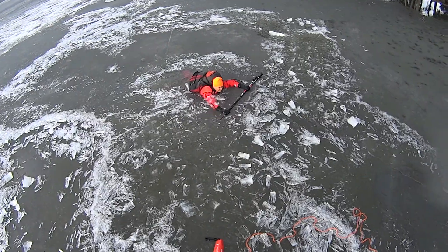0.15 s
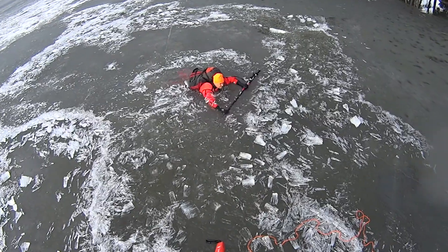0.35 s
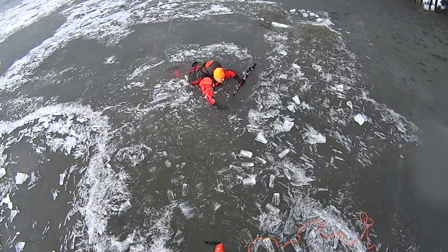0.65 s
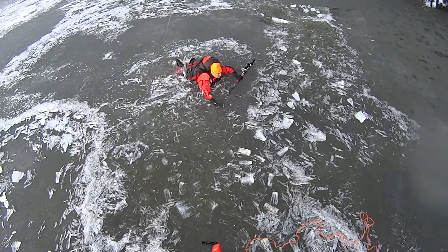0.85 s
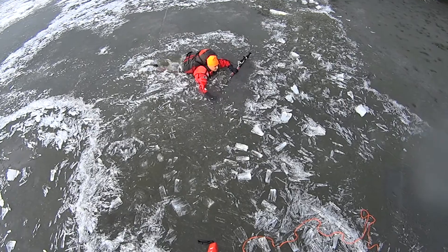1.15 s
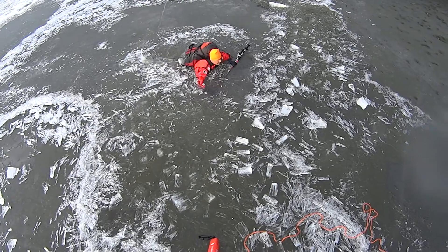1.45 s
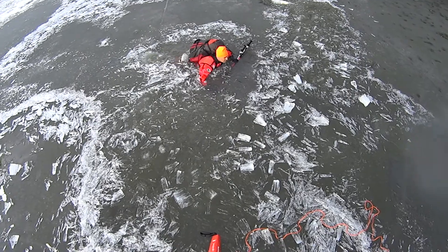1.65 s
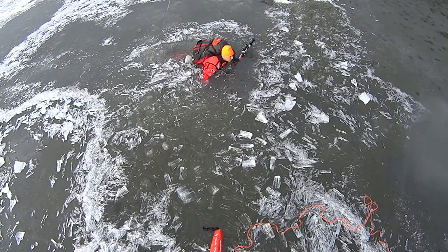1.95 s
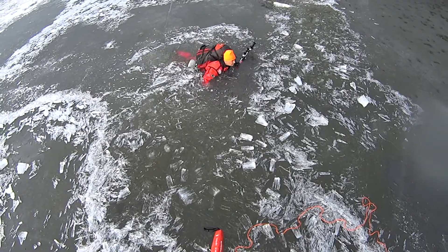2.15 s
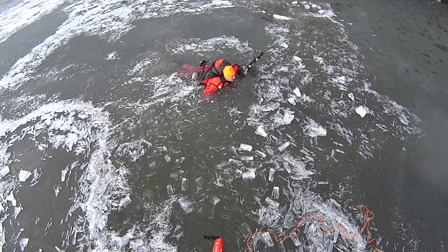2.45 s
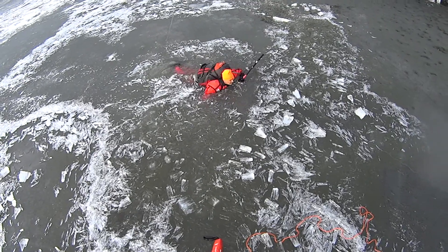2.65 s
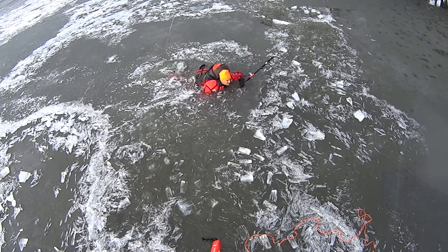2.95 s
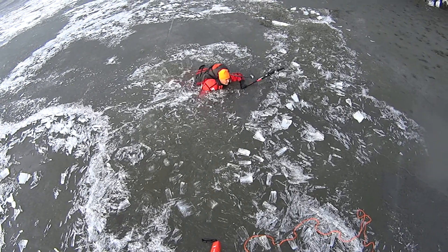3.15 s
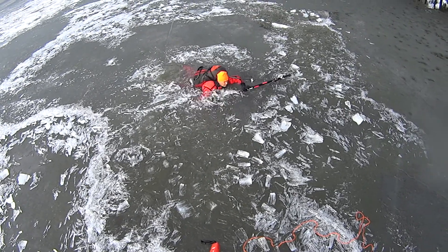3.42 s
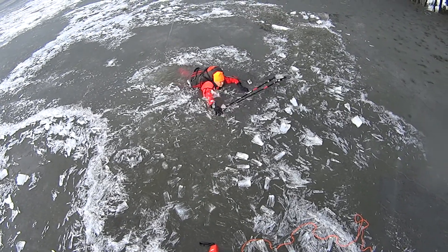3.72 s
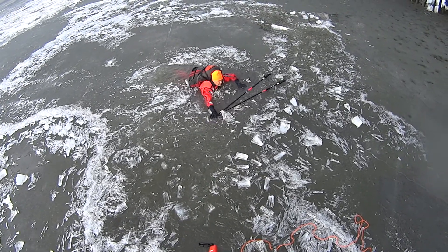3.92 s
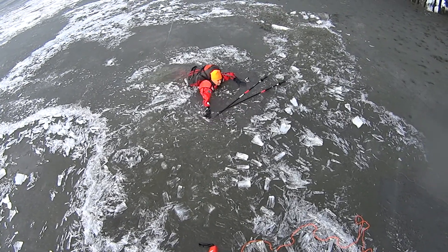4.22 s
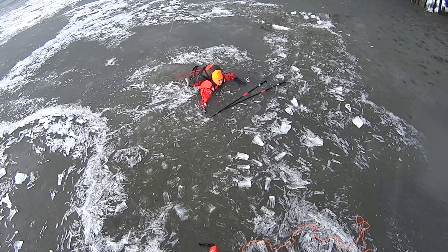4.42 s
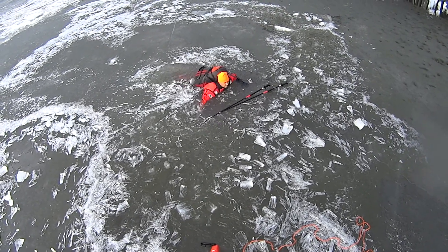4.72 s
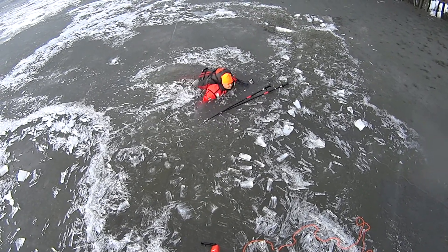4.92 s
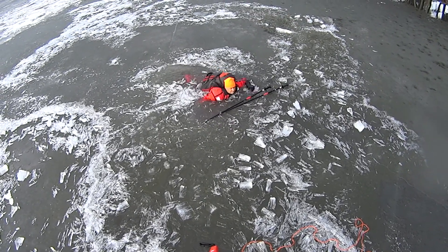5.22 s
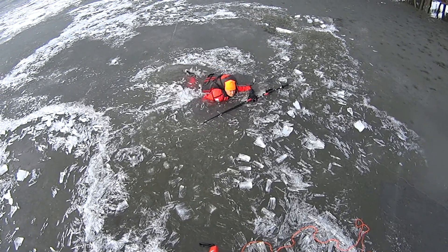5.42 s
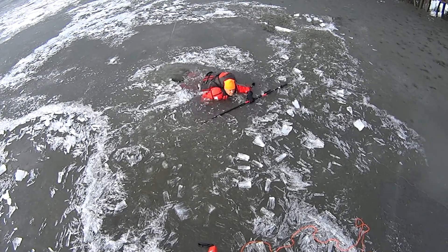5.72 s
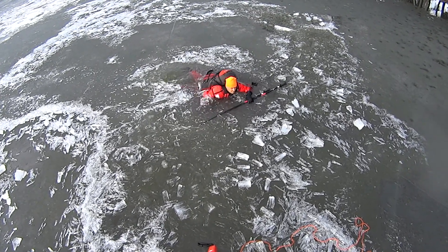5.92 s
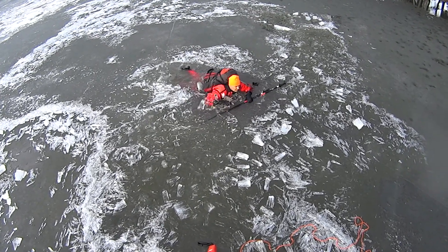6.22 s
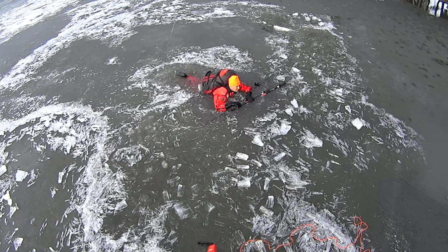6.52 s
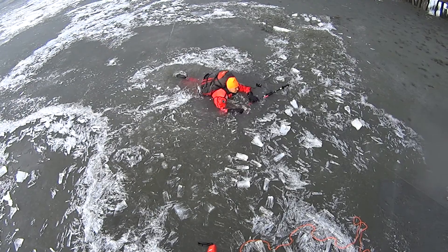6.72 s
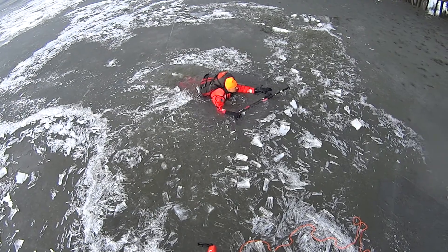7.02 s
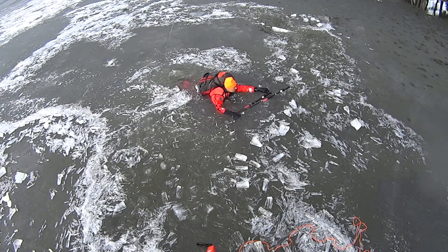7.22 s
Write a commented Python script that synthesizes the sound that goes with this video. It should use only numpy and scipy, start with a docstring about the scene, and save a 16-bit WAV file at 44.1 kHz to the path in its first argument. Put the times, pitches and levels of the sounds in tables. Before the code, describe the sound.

Water sloshes and thin broken ice crackles and clinks in repeated surges as someone swims through it, over light wind.

```python
"""On a lake of thin broken ice, a swimmer crawls along some metres from a small camera in a housing.
Each stroke shoves the floating shards together (dense crackle, single glassy clinks) and churns
the water (spray, bubbles, slaps); its wake keeps the ice rocking for seconds.
Close by, the camera mount is bumped and rubs, while a light wind rumbles underneath."""
import sys
import numpy as np
from scipy import signal
from scipy.fft import rfft, irfft, next_fast_len
from scipy.io import wavfile
from scipy.ndimage import map_coordinates

SR = 44100
rng = np.random.default_rng(int(sys.argv[2]) if len(sys.argv) > 2 else 0)


def output_pcm(signal):
    """Save a mono or channel-first signal as 16-bit PCM at the path in sys.argv[1].

    Samples are clipped to [-1, 1] before scaling.
    """
    pcm = np.clip(np.atleast_2d(signal).T, -1, 1) * 32767
    wavfile.write(sys.argv[1], SR, np.round(pcm).astype(np.int16))


N = 325017


def amp(db):
    """Decibels to gain."""
    return 10 ** (np.asarray(db) / 20)


def decibels(power):
    """Power to decibels."""
    return 10 * np.log10(power + 1e-12)


def unit(x):
    """Scaled to rms 1."""
    return x / np.sqrt(np.mean(x ** 2) + 1e-20)


def along(points, hz):
    """(Hz, value) points read on a log axis."""
    f, v = np.transpose(points)
    return np.interp(np.log(hz + 1), np.log(f + 1), v)


def wobble(rate):
    """A smooth random curve, rate knots a second."""
    return map_coordinates(rng.standard_normal(int(N * rate / SR) + 4), [np.arange(N) * rate / SR])


def filtered(x, response):
    """x times a response of frequency."""
    m = next_fast_len(N + SR // 2)
    return irfft(rfft(x, m) * response(np.fft.rfftfreq(m, 1 / SR)), m)[..., :N]


def equalised(x, eq):
    """x through an EQ curve of (Hz, dB) points."""
    return filtered(x, lambda hz: amp(along(eq, hz)))


def add(track, s, sound):
    """Mix a sound into a track at time s."""
    start = max(0, round(s * SR))
    part = track[..., start:start + sound.shape[-1]]
    part += sound[..., :part.shape[-1]]


def swell(s, rise, hold, t60):
    """Power over time of one push: it builds up to time s, holds, then dies away."""
    t = np.arange(N) / SR - s
    attack = np.exp(-np.clip(-t / rise, 0, 10) ** 2)
    return attack * amp(-60 * np.maximum(t - hold, 0) / t60) ** 2


def grains(level_db, count, band_hz, cycles, samples, scatter_db=0, rise=0):
    """A cloud of tiny rings that swell and die, more crowded where level_db is high; rms 1 throughout."""
    density = amp(level_db / 2)
    start = np.searchsorted(np.cumsum(density) / density.sum(), rng.random(count)).clip(0, N - 1)
    hz = rng.uniform(*band_hz, (count, 1))
    life = cycles / hz * np.exp(rng.normal(0, 0.52, (count, 1)))
    strength = amp(scatter_db * np.minimum(rng.exponential(1, (count, 1)), 4))
    t = np.arange(samples) / SR
    age = t / life
    glide = 1 + rise * np.minimum(age, 2)
    rings = strength / np.sqrt(life) * age * np.exp(-2 * age) * np.sin(2 * np.pi * hz * t * glide)
    cloud = np.bincount((start[:, None] + np.arange(samples)).ravel(), rings.ravel(), N + samples)[:N]
    return unit(cloud / np.sqrt(density))


# Surges of ice and water: strokes, kicks and one short crack of ice. Each row: moment of full force,
# rise and hold in seconds, then ice, splash and gurgle levels in dB.
SURGES = [(0.0, .02, .23, -31.5, -38, -52.5), (0.78, .02, .03, -35.5, -39.5, -54),
          (0.89, .04, .09, -41, -42.5, -53.5), (1.09, .025, .05, -33.5, -39.5, -51.5),
          (1.28, .08, .07, -36.5, -40, -50), (1.52, .13, .27, -41, -46, -60),
          (2.38, .05, .33, -40.5, -52, -66), (2.93, .06, .18, -34, -40, -52),
          (3.36, .15, .18, -26.5, -35.5, -48.5), (3.63, .05, .09, -28, -37, -47.5),
          (3.8, .012, .01, -27.5, -38.5, -56), (4.34, .06, .2, -32.5, -40, -54.5),
          (4.89, .06, .15, -34, -45, -62), (5.16, .09, .19, -26.5, -35, -47),
          (5.62, .18, .2, -33.5, -38.3, -52), (6.04, .09, .2, -29.5, -36.5, -50),
          (6.555, .02, .03, -34.5, -40, -50), (6.69, .04, .08, -35.5, -39, -49.5),
          (7.2, .18, .12, -38, -49, -66)]

def surges(release_t60_s=0.7, wake_t60_s=4.2, wake_db=-5.5):
    """Ice, splash and gurgle levels in dB: a surge dies quickly, but its wake rocks on for seconds."""
    power = amp([[-45.5], [-56], [-70]]) ** 2  # what stirs between surges
    wake_share = amp(wake_db) ** 2
    for s, rise, hold, *levels_db in SURGES:
        push = (1 - wake_share) * swell(s, rise, hold, release_t60_s)
        wake = wake_share * swell(s, rise, hold, wake_t60_s)
        power = power + np.outer(amp(levels_db) ** 2, push + wake)
    return decibels(power)


# The bright, brittle tone of the ice. Each row: frequency in Hz, gain in dB.
ICE_EQ = [(900, -37.5), (2000, -12.5), (3100, -7), (3600, -5.5), (5500, -4), (7000, -6), (9100, -6),
          (9750, -16), (11000, -20.5)]

def shards(level_db):
    """Thin plates scrape and tick in clumps; a few ring on like glass, the finest merge into a wash."""
    ticks = grains(level_db, count=60000, band_hz=(1530, 11260), cycles=1.2, samples=64, scatter_db=1)
    tinkle = grains(level_db, count=6500, band_hz=(2402, 10490), cycles=29, samples=750, scatter_db=2.5)
    wash = rng.standard_normal(N)
    clumps = amp(0.5 * wobble(55) + 0.3 * wobble(17))
    return amp(level_db) * clumps * housed(ticks + amp(-3.5) * tinkle + amp(2.5) * wash, ICE_EQ)


# Single plates of ice colliding. Each row: hit time in seconds, pitch in Hz, level in dB.
CLINKS = [(0.031, 4950, -23.5), (1.089, 4970, -28), (1.110, 6600, -29), (2.388, 4740, -31),
          (2.442, 4930, -30), (2.727, 8000, -35), (2.909, 7900, -32), (3.397, 8300, -22),
          (3.622, 4580, -17), (3.696, 6400, -21), (3.800, 4780, -14), (3.871, 5150, -23),
          (4.003, 8960, -31), (4.015, 6100, -27), (4.335, 4900, -28), (4.578, 4860, -25),
          (5.130, 5000, -23), (5.341, 6200, -23), (5.463, 4700, -21), (5.644, 3210, -29),
          (6.047, 5200, -22), (6.291, 9040, -28), (6.360, 4900, -23), (6.783, 4650, -24),
          (7.145, 5080, -27), (7.223, 7600, -30), (7.265, 8360, -30.5)]

def clinks(ring_t60_s=0.042, mode_ratio=1.018, scrape_s=0.03):
    """A scrape builds to a crack; then a close pair of plate modes rings until the water damps it."""
    rings, cracks = np.zeros((2, N))
    t = np.arange(SR // 10) / SR
    for s, hz, db in CLINKS:
        pair = np.sin(2 * np.pi * hz * t) + 1.62 * np.sin(2 * np.pi * hz * mode_ratio * t)
        attack = 1 - np.exp(-t / 0.002)
        add(rings, s - 0.001, amp(db - 60 * t / ring_t60_s) * attack * pair)
        crack_db = db - 2 - 60 * abs(t - scrape_s) / 0.025
        add(cracks, s - scrape_s, amp(crack_db) * rng.standard_normal(len(t)))
    return rings + equalised(cracks, ICE_EQ)


# The tones of the bright splash and the deeper gurgle. Each row: frequency in Hz, gain in dB.
SPLASH_EQ = [(700, -39), (1250, -12), (1650, -2.5), (2300, 0.5), (2850, -0.5), (3300, -5.5), (5000, 1.5),
             (9000, -55)]
GURGLE_EQ = [(300, -24), (700, -22), (950, -11), (1250, -1), (1550, -2.5), (1900, -2.5), (3000, -33)]

def water(splash_db, gurgle_db):
    """Each surge throws spray and traps bubbles, whose pitch rises as they surface."""
    small = grains(splash_db, count=6000, band_hz=(1319.6, 3588), cycles=14.4, samples=1000, rise=0.0084)
    large = grains(gurgle_db, count=3200, band_hz=(660, 1901), cycles=10.3, samples=1300,
                   scatter_db=0.5, rise=0.021)
    spray = rng.standard_normal((2, N))
    splash = amp(splash_db) * housed(small + 1.65 * spray[0], SPLASH_EQ)
    gurgle = amp(gurgle_db) * housed(large + 1.34 * spray[1], GURGLE_EQ)
    return (splash + gurgle) * amp(0.38 * wobble(45))


# An arm or a plate slapping the water. Each row: time in seconds, bubble pitch in Hz,
# bubble level in dB, spray level in dB.
SLAPS = [(0.185, 2066, -33, -38), (0.675, 1790, -43, -39), (0.79, 2033, -39, -34.5),
         (1.095, 2180, -42, -37), (2.94, 1810, -35, -31.5), (3.225, 2290, -32, -30.5),
         (3.728, 1940, -31, -27), (4.414, 1890, -27, -41), (4.868, 1950, -32, -31), (6.554, 1560, -40, -31),
         (6.708, 1550, -41, -33)]

def slaps(count=4, closing_s=0.009):
    """A slap puffs spray and closes over air, which breaks into a run of bubbles of about one size."""
    bubbles, puffs = np.zeros((2, N))
    t = np.arange(SR // 20) / SR
    around = np.arange(-SR // 20, SR // 20) / SR
    for s, hz, bubble_db, spray_db in SLAPS:
        add(puffs, s + around[0], amp(spray_db) * np.exp(-0.5 * (around / closing_s) ** 2))
        envelope = amp(bubble_db + 2.5 - 60 * t / 0.037) * (1 - np.exp(-t / 0.0006))
        for place in np.linspace(-1, 1, count):
            jitter, detune = rng.standard_normal(2)
            phase = 2 * np.pi * hz * (1 + 0.032 * detune) * t * (1 + t)  # a slight upward chirp
            add(bubbles, s + closing_s * (0.77 * place + 0.213 * jitter), envelope * np.sin(phase))
    return bubbles + puffs * housed(rng.standard_normal(N), SPLASH_EQ)


# Resonances and notches of the housing. Each row: centre in Hz, width in Hz, gain in dB.
HOUSING_BANDS = [(910, 75, 4), (2115, 420, 5.5), (2690, 110, 2), (3070, 360, -3.5), (4220, 220, -1.5),
                 (4610, 440, 3.5), (4962, 456, 6.5), (6020, 800, 2), (8800, 650, 1), (10340, 350, 4.5)]

def housed(x, eq):
    """x with its own EQ, coloured by the resonances of the housing, at rms 1."""
    def housing_db(hz):
        return sum(db / (1 + (2 * (hz - centre) / width) ** 2) for centre, width, db in HOUSING_BANDS)
    return unit(filtered(x, lambda hz: amp(along(eq, hz) + housing_db(hz))))


# Stereo image of the ice and water. Each row: frequency in Hz, left-right likeness (1 is mono).
STEREO_LIKENESS = [(500, 0.55), (1100, 0.79), (2000, 0.96), (4000, 0.91), (4900, 0.99), (6000, 0.9),
                   (8000, 0.95), (10000, 0.88)]

def ice_scatter(x, t60_s=0.088):
    """The sound comes from straight ahead; scatter off the ice sheet widens it a little."""
    def width_angle(hz):
        return np.arccos(along(STEREO_LIKENESS, hz)) / 2
    t = np.arange(SR // 16) / SR
    tail = rng.standard_normal(len(t)) * amp(-60 * t / t60_s)
    scattered = signal.fftconvolve(x, tail / np.linalg.norm(tail))[:N]
    mid = filtered(x, lambda hz: np.cos(width_angle(hz)))
    side = filtered(scattered, lambda hz: np.sin(width_angle(hz)))
    return np.array([mid + side, mid - side]) * amp([[-0.25], [0.25]])


# Bumps on the camera mount. Each row: start in seconds, level in dB.
KNOCKS = [(0.279, -39), (0.2892, -31), (0.389, -38.5), (0.400, -41), (0.448, -30.5), (0.479, -42),
          (0.636, -45), (1.176, -46.5), (1.777, -49), (4.624, -45)]
# The ring of the mount. Each row: pitch in Hz, gain in dB, seconds to fall by 60 dB.
MOUNT_MODES = [(140, -6, 0.075), (220, -8, 0.048), (314, -7, 0.045), (447, -8, 0.014), (516, 1.5, 0.031),
               (605, -0.5, 0.047), (770, -17, 0.017), (1110, -6, 0.019), (1250, -2, 0.021),
               (1484, -1.5, 0.029)]

def knocks():
    """Dull bumps reach each microphone by its own path through the mount; low modes build more slowly."""
    track, t = np.zeros((2, N)), np.arange(SR // 8) / SR
    for s, db in KNOCKS:
        for hz, mode_db, t60 in MOUNT_MODES:
            phases = rng.normal(0, 1) + np.array([[1], [-1]]) * rng.normal(0.42, 0.25)
            ring = np.sin(2 * np.pi * hz * (1 + rng.normal(0, 0.035)) * t + phases)
            attack = 1 - np.exp(-t * hz / 0.52)
            add(track, s, amp(db + mode_db - 60 * t / t60) * attack * ring)
    return track * amp([[-1.5], [1.5]])


# Shifts of the mount. Each row: moment of full force in seconds, hold in seconds, level in dB.
RUBS = [(0.105, 0.039, -55.5), (.27, 0.2, -51), (.64, .04, -58), (1.166, 0.535, -60)]
# Their muffled tone. Each row: frequency in Hz, gain in dB.
RUB_EQ = [(40, 3.5), (100, -6), (200, -5.5), (400, -3.5), (560, 0.5), (800, -14), (1200, -11),
          (2000, -13.5)]

def rubs(rise_s=0.035, t60_s=0.36):
    """The mount rubs in small fits and starts before it settles."""
    level_db = decibels(sum(amp(db) ** 2 * swell(s, rise_s, hold, t60_s) for s, hold, db in RUBS))
    mid, side = unit(equalised(rng.standard_normal((2, N)), RUB_EQ))
    return amp(level_db + 5.1 * wobble(50.5)) * (mid + 0.67 * side * np.array([[1], [-1]]))


# Soft thumps. Each row: time in seconds, level in dB.
THUMPS = [(0.16, -45), (3.924, -44), (3.976, -42), (4.85, -46.5), (4.991, -48), (5.551, -41.5), (5.89, -46),
          (6.921, -48)]

def thumps(hz=140, rise_s=0.009):
    """Now and then a low thump comes through the mount, swells and dies."""
    track, t = np.zeros(N), np.arange(SR // 8) / SR
    age = t / rise_s
    thump = (age * np.exp(1 - age)) ** 2 * np.sin(2 * np.pi * hz * t)
    for s, db in THUMPS:
        add(track, s - 0.004, amp(db - 5) * thump)
    return track


# Low rumble: a brief swell as the camera is handled, then wind slowly slackening.
# Each row: time in seconds, level in dB.
RUMBLE_LEVELS = [(0, -51.5), (.42, -47), (.6, -50), (1.9, -52), (2.95, -52.5), (3.15, -52.5), (4.1, -54.5),
                 (5.4, -53.5), (6.4, -56.5), (7.37, -57)]
# The tones of the rumble and of the airy hiss. Each row: frequency in Hz, gain in dB.
RUMBLE_EQ = [(10, -6.5), (26, 0), (42, -7.5), (65, -9.5), (85, -9), (110, -19), (135, -17.5), (200, -25.5),
             (400, -32.5), (1000, -67)]
AIR_EQ = [(60, -9.5), (200, -2.5), (330, -0.5), (520, 2), (750, 0.5), (1500, -1), (5000, -6.5),
          (11000, -27)]

def rumble_and_air():
    """Early handling, then wind, rumbles on the housing, alike on both sides, in a faint wide hiss."""
    rumble_db = np.interp(np.arange(N) / SR, *np.transpose(RUMBLE_LEVELS))
    rumble = amp(rumble_db + wobble(11)) * unit(equalised(rng.standard_normal(N), RUMBLE_EQ))
    mid, side = unit(equalised(rng.standard_normal((2, N)), AIR_EQ))
    hiss = amp(-61) * mid + amp(-55.5) * side * np.array([[1], [-1]])
    return rumble + hiss * amp(1.75 * wobble(15))


def scene():
    """Ice and water ahead, bumps and wind at the camera."""
    ice_db, splash_db, gurgle_db = surges()
    swimmer = shards(ice_db) + water(splash_db, gurgle_db) + clinks() + slaps()
    return ice_scatter(swimmer) + knocks() + rubs() + thumps() + rumble_and_air()


def record(dry, top_hz=11050):
    """The camera keeps nothing above its band limit."""
    return filtered(dry, lambda hz: hz < top_hz)


dry = scene()
out = record(dry)
output_pcm(out)
```